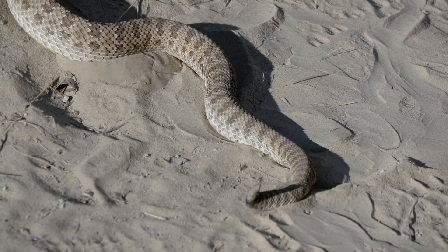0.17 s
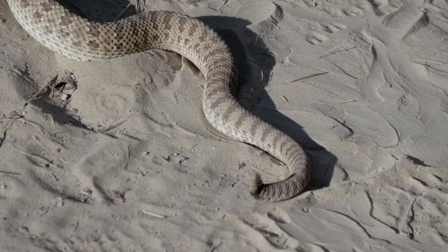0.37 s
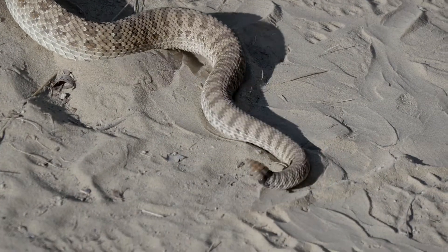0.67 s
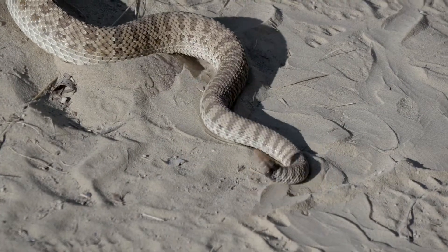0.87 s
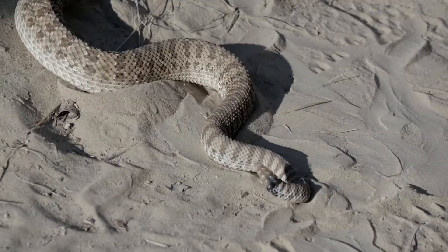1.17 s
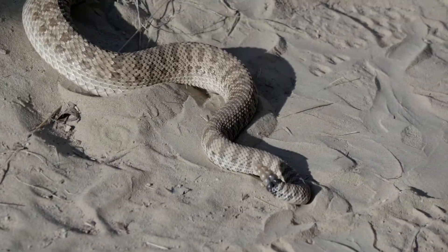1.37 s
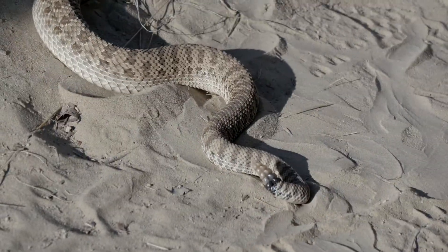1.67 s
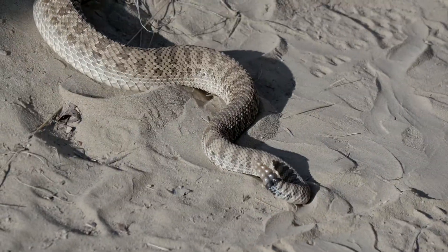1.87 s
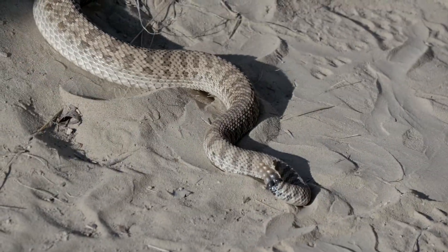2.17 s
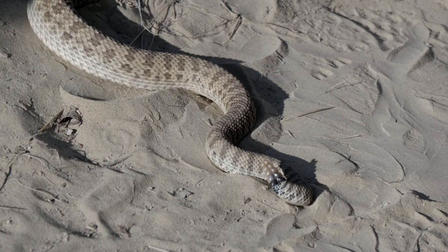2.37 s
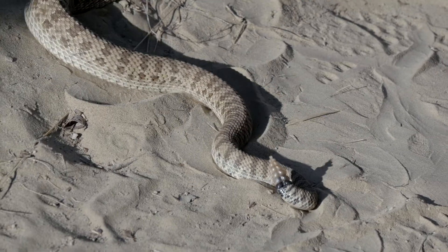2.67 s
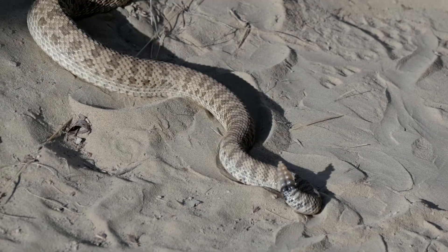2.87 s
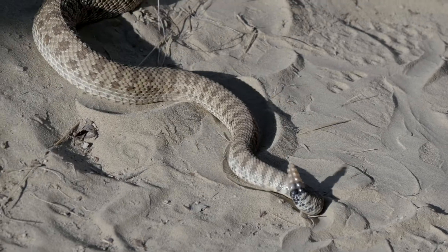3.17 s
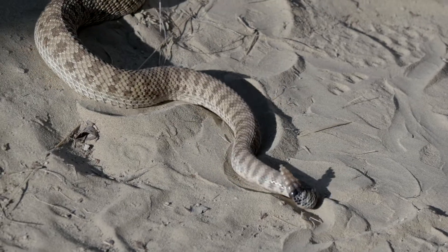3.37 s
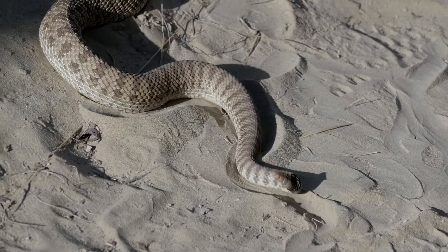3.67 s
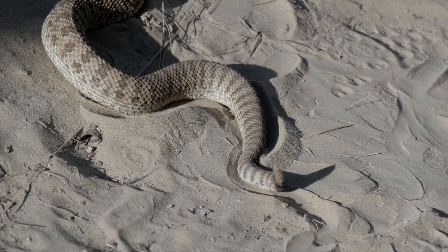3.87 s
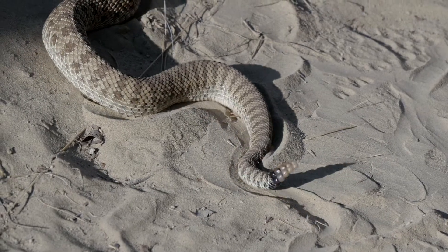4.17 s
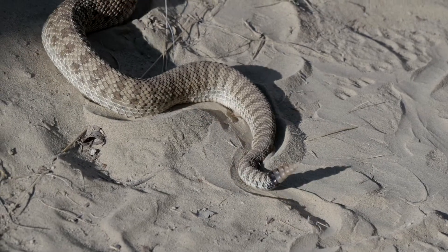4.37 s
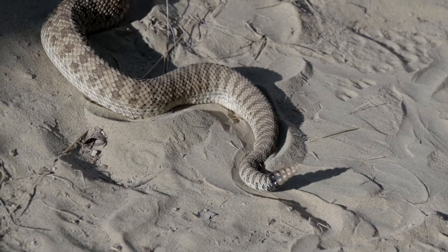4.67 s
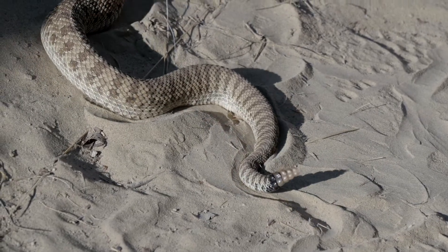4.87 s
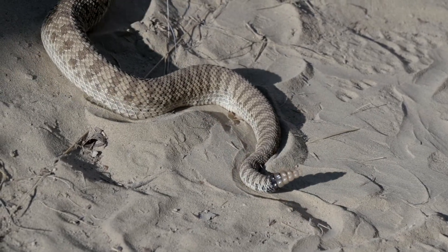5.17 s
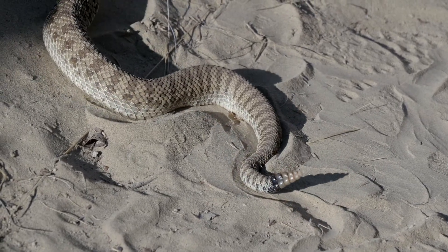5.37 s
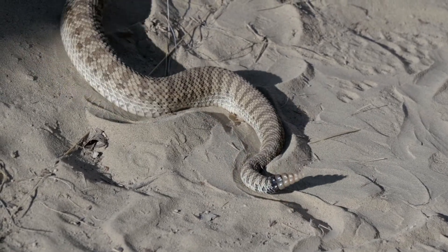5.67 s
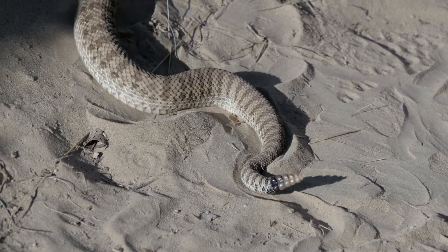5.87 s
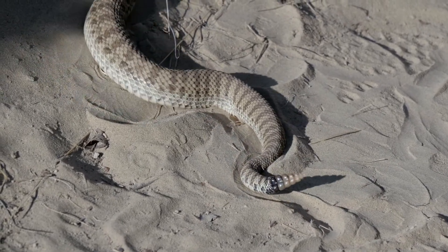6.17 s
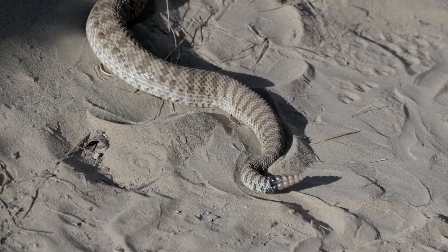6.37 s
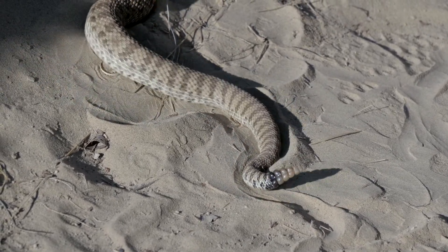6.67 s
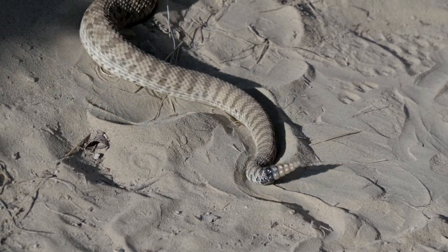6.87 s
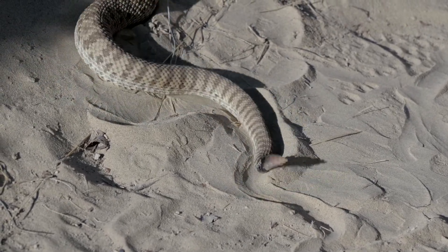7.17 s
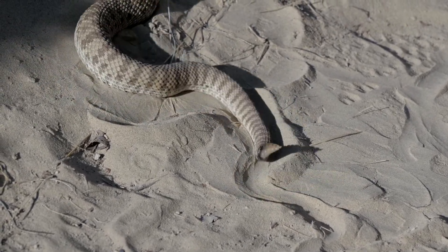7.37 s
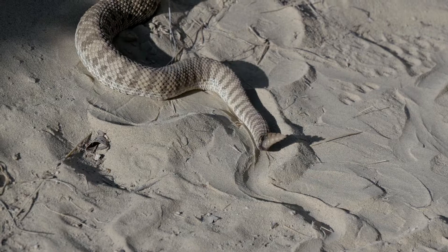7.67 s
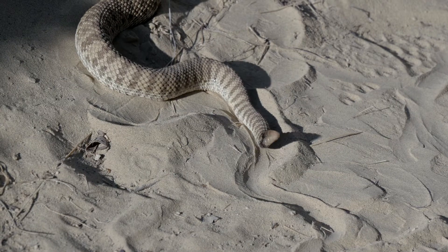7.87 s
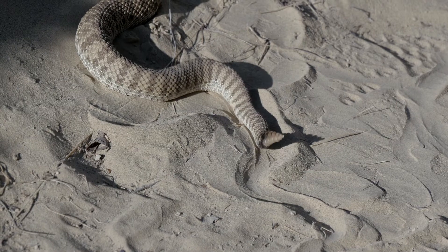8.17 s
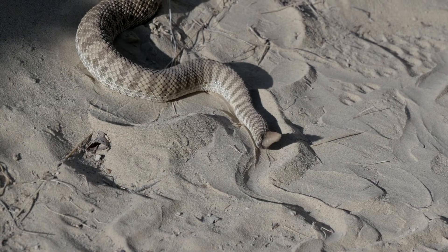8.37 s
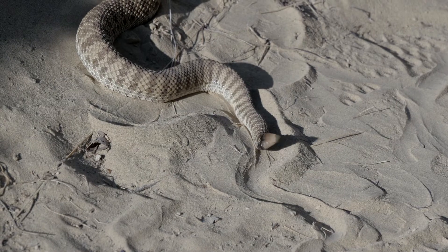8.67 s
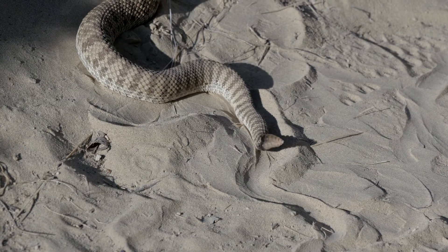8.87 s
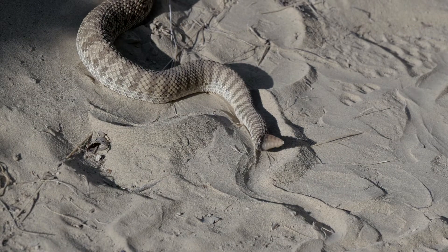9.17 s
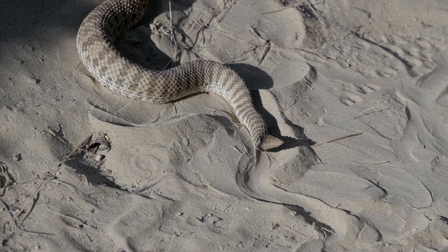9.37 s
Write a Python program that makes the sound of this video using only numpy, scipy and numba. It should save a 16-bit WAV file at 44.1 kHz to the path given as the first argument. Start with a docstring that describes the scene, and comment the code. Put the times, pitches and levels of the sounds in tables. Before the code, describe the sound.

A rattlesnake shakes its tail in a dry, high, pulsing buzz outdoors, with a few low wind thumps on the microphone midway.

```python
"""A rattlesnake shakes its tail on open sand over a soft wash of far-off wind. Each swing knocks the
dry, hollow segments of the rattle together in a shower of clicks. An animal calls faintly at 0.5 s,
and the rattling builds. From 4 to 5.5 s a gust thumps on the two microphone ports while the swings
slow down; by 7 s they are fast again. A second faint call follows, and near 8.5 s grit ticks under
the body as the snake crawls on."""
import sys
import numpy as np
from scipy import signal
from scipy.fft import rfft, irfft, next_fast_len
from scipy.io import wavfile
from scipy.ndimage import uniform_filter1d
from numba import njit

SR = 44100
rng = np.random.default_rng(int(sys.argv[2]) if len(sys.argv) > 2 else 0)


def materialize(psi):
    """Save the field psi as 16-bit PCM at rate SR to the path in sys.argv[1].

    A 1-D psi becomes a single channel; in a 2-D psi each row is a channel.
    """
    bounded = np.clip(np.atleast_2d(psi).T, -1, 1)
    quanta = np.round(bounded * 32767).astype(np.int16)
    wavfile.write(sys.argv[1], SR, quanta)


N = 419391
TIME = np.arange(N) / SR
BUZZ_HZ = 20.  # reference swing rate


def gain_of(db):
    """Decibels to amplitude."""
    return 10 ** (np.asarray(db) / 20)


def curves(rows):
    """Each value column of a table, linearly interpolated over TIME."""
    times, *columns = np.transpose(rows)
    return [np.interp(TIME, times, column) for column in columns]


def add(mix, start_s, sound):
    """Mixes a sound into a stereo track."""
    part = mix[:, round(start_s * SR):][:, :sound.shape[-1]]
    part += sound[..., :part.shape[1]]


def filtered(x, response):
    """Applies a gain given as a function of frequency."""
    size = next_fast_len(N)
    hz = np.fft.rfftfreq(size, 1 / SR) + 1
    return irfft(rfft(x, size) * response(hz), size)[..., :N]


def noise(spectrum, channels):
    """Independent noises of one spectral shape, rms 1."""
    points_hz, db = np.transpose(spectrum)
    white = rng.standard_normal((channels, N))
    shaped = filtered(white, lambda hz: gain_of(np.interp(np.log(hz), np.log(points_hz + 1), db)))
    return shaped / np.sqrt(np.mean(shaped ** 2) + 1e-20)


def drift(per_s):
    """Random wander, spread about 1."""
    return np.interp(TIME * per_s, np.arange(4096), rng.standard_normal(4096))


# tail tempo: (time [s], swing rate [Hz])
SWING_RATE = [(0.0, 18.45), (0.41, 21.99), (0.68, 19.04), (1.23, 22.29), (1.46, 20.44), (2.4, 21.9),
              (3.48, 16.31), (3.67, 18.07), (3.83, 16.23), (5.11, 12.49), (5.31, 10.23), (5.75, 9.37),
              (5.97, 16.38), (6.66, 20.08), (6.83, 18.91), (7.05, 23.03), (7.26, 18.89), (7.52, 19.62),
              (7.82, 14.25), (8.39, 19.68), (8.75, 18.95), (8.97, 22.91), (9.25, 18.43), (9.5, 21.18)]


def swing_times(lead_in_cycles=.18):
    """Times [s] at which the tail turns, once a cycle."""
    cycles = np.cumsum(curves(SWING_RATE)[0]) / SR - lead_in_cycles
    return TIME[1:][np.diff(np.floor(cycles)) > 0]


# shaking effort: (time [s], swing level [dB], chatter level [dB])
TAIL_EFFORT = [(0, -43.5, -55), (.5, -43, -54), (1.25, -38.5, -45.5), (1.65, -34, -46.5), (2.0, -32, -42),
               (2.35, -37.5, -35.5), (2.7, -29, -42.5), (3.05, -28, -41.5), (3.42, -25, -44),
               (3.7, -26.5, -38.5), (4.1, -28.5, -44.5), (4.3, -33.5, -51), (4.7, -35, -48.5),
               (5.15, -31.5, -46), (5.5, -34.5, -53), (5.97, -34.5, -50), (6.35, -28.5, -42),
               (6.55, -28, -48), (6.73, -27.5, -35), (7.05, -31.5, -39), (7.85, -32.5, -38.5),
               (8.07, -27, -42.5), (8.6, -29, -39.5), (9.0, -31, -39), (9.5, -29, -39.5)]
# harder, shorter swings: (time [s], boost [dB])
TAIL_WHIPS = [(.11, 6), (.27, 4), (1.46, 2.5), (2.64, 4), (2.84, 4), (3.39, 1.5), (3.74, 1.5), (4.45, 4.5),
              (4.88, 5.5), (5.05, 3), (5.70, 4.5), (6.56, 0.5), (8.65, 4.5), (9.44, 3.5)]


def shaking(surge_s=.007, lag_s=.00032, rise_ratio=.75, rebound_power=.15, rebound_s=.021):
    """Collision power: a surge and a weaker rebound per swing, over the chatter of loose segments."""
    effort_db, chatter_db = curves(TAIL_EFFORT)
    turns_s = swing_times()
    level_jitter, width_jitter = rng.standard_normal((len(turns_s), 2)).T
    levels_db = np.interp(turns_s, TIME, effort_db) + 1.16 * level_jitter
    widths_s = surge_s * np.exp(.22 * width_jitter)
    for whip_s, boost_db in TAIL_WHIPS:
        nearest = np.argmin(abs(turns_s - whip_s))
        levels_db[nearest] += boost_db
        widths_s[nearest] *= .78
    power = gain_of(chatter_db - .5) ** 2
    for peak_s, db, width_s in zip(turns_s + lag_s, levels_db, widths_s):
        near = slice(max(round((peak_s - .04) * SR), 0), round((peak_s + .08) * SR))
        t = TIME[near] - peak_s
        surge = np.exp(-.5 * (t / (width_s * np.where(t < 0, rise_ratio, 1))) ** 2)
        rebound = rebound_power * np.exp(-.5 * ((t - rebound_s) / (.5 * width_s)) ** 2)
        power[near] += gain_of(db) ** 2 * (surge + rebound)
    return power


def collisions(tempo_ratio, base_per_s=2300, spread_db=5.5, clump_db=3.5, scrape=.1, share_s=.016):
    """Clumps of uneven knocks share out a swing's energy, with light scraping between them."""
    hardness = np.minimum(rng.standard_normal(N), 1.3)  # capped by the small play between segments
    size_db = spread_db * hardness + clump_db * drift(220)
    per_s = base_per_s * tempo_ratio ** 1.4
    energy = (rng.random(N) < per_s / SR) * gain_of(size_db) ** 2
    energy += scrape * energy.mean()
    return np.sqrt(energy / uniform_filter1d(energy, int(share_s * SR)))


@njit
def ring(drive, angle_rad, radius):
    """One mode with moving pitch and damping; preserves the power of its drive."""
    out = np.zeros(drive.shape)
    state = np.zeros(2, np.complex128)
    for i in range(len(angle_rad)):
        pole = radius[i] * complex(np.cos(angle_rad[i]), np.sin(angle_rad[i]))
        for c in range(2):
            state[c] = state[c] * pole + drive[c, i] * np.sqrt(2 * (1 - radius[i] ** 2))
            out[c, i] = state[c].imag
    return out


# modes of the horny segments: (base frequency [Hz], base width [Hz], level [dB])
SHELL_MODES = [(3490,230,-12.5), (3760,200,-8), (4550,66,-9.5), (5140,240,-9), (5560,363,-2.5),
               (6050,163,-1.5), (6570,116,-7.5), (6950,107,-5), (7420,182,-1), (7830,110,-6.5),
               (8340,176,-3.5), (8920,94,-7.5), (9590,114,-4), (10055,265,1), (10580,300,0.5),
               (11400,100,-5), (12170,300,-16), (12760,400,-7), (13700,200,-17), (14700,750,-22.5)]
# how the rattle is held: (time [s], hollow low ring [dB], tilt [dB/octave])
RATTLE_POSE = [(0, -4, 0), (1.2, -1, -4), (1.7, 1.5, 0), (2.3, .5, -5), (2.7, 5, 3.5), (3.05, 8.5, 6.5),
               (3.45, -4.5, 4), (4.1, 2, 3), (4.4, -3, -6.5), (4.8, 0.5, 2), (5.6, -3, 4.5), (5.9, -8, -3),
               (6.3, 4, 3), (6.6, -1, -1.5), (7.6, 0.5, -3), (8.2, 3, 2), (8.8, -1.5, -2.5),
               (9.5, 1.5, -2.5)]
# mode sag while the tail is curled and lifted: (time [s], pitch [ratio])
MODE_SAG = [(2.6, 1), (3.1, .99), (3.65, .96), (4.4, .98), (5.2, .975), (5.9, 1)]
# segments that knock hardest as the tail turns: (time [s], frequency [Hz], boost [dB])
HARD_CONTACT = [(3.2, 4530, 14.5), (3.42, 4740, 15), (3.6, 5350, 4), (3.85, 7140, 5.5), (4.1, 7600, 4),
                (4.45, 5600, 1.5), (4.88, 5600, 12.5), (5.05, 5800, 1), (5.21, 5000, 12), (5.3, 4900, 11),
                (5.4, 7060, 6), (5.7, 7260, 8.5), (5.9, 6600, 11), (6.1, 6600, -8)]


def rattle(hollow_hz=4150, pivot_hz=7500, low_hz=3300, top_hz=14500, reach_octaves=.15, side_gain=.37):
    """Each knock rings the shell modes in its own mixture, slightly different at each port."""
    hollow_db, tilt_db = curves(RATTLE_POSE)
    sag, = curves(MODE_SAG)
    contact_hz, contact_db = curves(HARD_CONTACT)
    contact_db *= (TIME > HARD_CONTACT[0][0]) & (TIME < HARD_CONTACT[-1][0])
    tempo_ratio = curves(SWING_RATE)[0] / BUZZ_HZ
    knocks = collisions(tempo_ratio) * np.sqrt(shaking())
    damping = 1.06 / tempo_ratio ** 1.03  # slower swings choke the ring
    modes, power = np.zeros((2, N)), np.zeros(N)
    for hz, width_hz, db in SHELL_MODES:
        struck_db = contact_db * np.exp(-(np.log2(hz / contact_hz) / reach_octaves) ** 2)
        bright_db = tilt_db * np.log2(hz / pivot_hz)
        wander_db = 1.5 * np.sqrt(damping) * drift(14)
        gain = gain_of(db + struck_db + bright_db + wander_db) * np.sqrt(width_hz)
        drive = gain * knocks * rng.standard_normal((2, N), dtype=np.float32)
        modes += ring(drive, 2 * np.pi * hz * sag / SR, np.exp(-np.pi * width_hz * damping / SR))
        power += gain ** 2
    modes /= np.sqrt(power)
    # a small shell barely radiates below its lowest mode
    radiated = filtered(modes, lambda hz: ((1 + (low_hz / hz) ** 16) * (1 + (hz / top_hz) ** 8)) ** -.5)
    hollow = filtered(radiated, lambda hz: 1 / (1 + (hz / hollow_hz) ** 40))
    mid, side = radiated + hollow * (gain_of(hollow_db) - 1)
    return np.array([mid + side_gain * side, mid - side_gain * side])


def sand_echo(x, echo_s=.00215, echo_gain=.073, scatter_db=-12, scatter_per_s=2000, t60_s=.087):
    """Adds one close echo off the sand and a short, faint tail scattered by its ripples."""
    t = np.arange(4096) / SR
    taps = rng.choice([-1., 1.], (2, len(t)))
    taps *= rng.random(taps.shape) < scatter_per_s / SR
    taps *= (t > echo_s) * gain_of(-60 * t / t60_s)
    taps *= gain_of(scatter_db) / np.linalg.norm(taps, axis=1, keepdims=True)
    taps[:, round(echo_s * SR)] += echo_gain
    return x + signal.oaconvolve(x, taps, axes=1)[:, :N]


# wash spectrum: (frequency [Hz], relative density [dB])
WASH_SPECTRUM = [(20, -23), (50, -16.5), (90, -10), (150, -6), (290, -3.5), (385, 1.5), (520, -2),
                 (680, -2.5), (800, -3), (1400, -5.5), (2500, -9.5), (5000, -10.5), (16000, -20)]
# wash contour: (time [s], base level [dB])
WASH_LEVEL = [(0, -48.5), (3.4, -45.5), (5.6, -47.5), (9.5, -46.5)]


def air_wash(boost_db=3., shared_power=.28, flutter_db=1.):
    """Far-off wind over open ground, partly alike at the two ports."""
    common, left, right = noise(WASH_SPECTRUM, channels=3)
    wash = np.sqrt(shared_power) * common + np.sqrt(1 - shared_power) * np.array([left, right])
    return wash * gain_of(curves(WASH_LEVEL)[0] + boost_db + flutter_db * drift(9))


# animal calls: (time [s], pitch [Hz], peak [dB], half length [s], waver [fraction of pitch])
ANIMAL_CALLS = [(.49, 1575, -49, .028, .005), (7.248, 830, -42, .016, .06)]


def far_calls():
    """Short, unsteady notes of distant animals, barely above the wash."""
    out = np.zeros(N)
    for peak_s, hz, db, half_s, waver in ANIMAL_CALLS:
        cycles = np.cumsum(hz * (1 + waver * drift(300))) / SR
        envelope = gain_of(db) * np.exp(-((TIME - peak_s) / half_s) ** 2)
        out += envelope * np.sin(2 * np.pi * cycles)
    return out


# eddies at the ports: (time [s], level [dB], frequency [Hz], left minus right [dB])
PORT_EDDIES = [(1.034, -44.5, 90, 3), (4.065, -25, 300, -1), (4.120, -24, 180, 15), (4.358, -18.5, 270, 18),
               (4.390, -15.5, 251, 16), (4.496, -11.5, 194, 15), (4.521, -16, 290, 17),
               (4.539, -18, 312, 15), (4.822, -11.5, 250, 17), (5.058, -6, 177, 17), (5.221, -21, 193, -15),
               (5.311, -9, 150, 5), (5.365, -9, 220, -18), (5.375, -12, 237, -11), (5.433, -16.5, 323, -21),
               (5.489, -14, 200, -12), (5.520, -28, 140, -1), (7.85, -42, 111, 10)]


def eddies(boost_db=1., base_cycles=.27, max_cycles=.9, db_per_doubling=14.5):
    """Short pressure swings, mostly at one port; weaker ones last more cycles."""
    out, t = np.zeros((2, N)), np.arange(-2048, 2048) / SR
    for peak_s, db, hz, pan_db in PORT_EDDIES:
        decay_cycles = min(base_cycles * 2 ** (-db / db_per_doubling), max_cycles)
        phase = rng.random((2, 1))
        pressure = np.cos(2 * np.pi * (hz * t + phase)) * np.exp(-abs(t) * hz / decay_cycles)
        port_db = np.minimum([[pan_db], [-pan_db]], 0)
        add(out, peak_s + t[0], pressure * gain_of(db + boost_db + port_db))
    return out


# turbulence spectrum: (frequency [Hz], relative density [dB])
PUFF_SPECTRUM = [(15, -64), (25, -34), (49, -4), (76, -5.5), (141, 0.5), (305, -5), (448, -16.5),
                 (649, -31), (793, -17), (1000, -30), (1300, -60), (2200, -120)]
# puffs at the ports: (time [s], decay [s], left level [dB], right level [dB])
PORT_PUFFS = [(2.98, 0.073, -49, -52), (4.07, 0.046, -31.5, -39), (4.39, 0.067, -41, -51),
              (4.53, 0.054, -32, -46), (4.83, 0.064, -38.5, -51), (5.07, 0.11, -36, -41.5),
              (5.31, 0.011, -20, -32), (5.37, 0.027, -52, -29.5), (5.47, 0.071, -41, -36)]


def puffs(boost_db=5., rise_ratio=.72):
    """Bursts of lumpy turbulence, independent at the two ports."""
    envelope = np.zeros((2, N))
    for peak_s, decay_s, left_db, right_db in PORT_PUFFS:
        decays = abs(TIME - peak_s) / (decay_s * np.where(TIME < peak_s, rise_ratio, 1))
        puff = gain_of([[left_db], [right_db]]) * np.exp(-np.minimum(decays, 20))
        envelope = np.maximum(envelope, puff)
    return noise(PUFF_SPECTRUM, channels=2) * gain_of(boost_db) * envelope


def port_wind(low_hz=92, top_hz=680):
    """Wind pressure at the ports is smooth, and the microphone is deaf to its slowest part."""
    pressure = puffs() + eddies()
    return filtered(pressure, lambda hz: ((1 + (hz / top_hz) ** 10) * (1 + (low_hz / hz) ** 7)) ** -.5)


# grit under the body: (time [s], level [dB])
GRIT_TICKS = [(8.379, -26), (8.415, -22), (8.452, -22), (8.531, -27), (8.567, -22)]


def grit(tick_hz=3300, decay_s=.00022):
    """Grit under the snake gives dry ticks, hardly a cycle long."""
    out, t = np.zeros((2, N)), np.arange(256) / SR
    tick = np.exp(-t / decay_s) * np.sin(2 * np.pi * tick_hz * t)
    for start_s, db in GRIT_TICKS:
        add(out, start_s, gain_of(db) * tick)
    return out


def scene():
    """Rattle and grit over sand, wind at the ports, distant calls and open air."""
    return sand_echo(rattle() + grit()) + port_wind() + far_calls() + air_wash()


def record(dry):
    """The camera's band limit."""
    edge_hz = 15850
    lowpass = signal.firwin(511, edge_hz, window=("kaiser", 9), fs=SR)
    return signal.oaconvolve(dry, lowpass[None], "same")


dry = scene()
out = record(dry)
materialize(out)
```